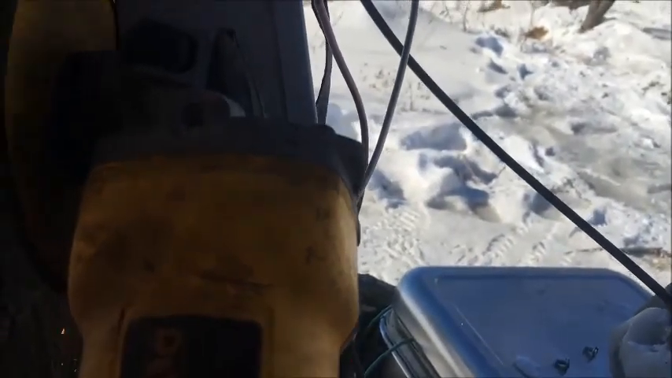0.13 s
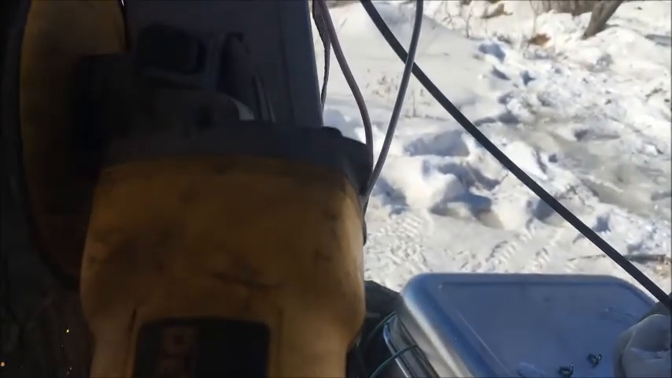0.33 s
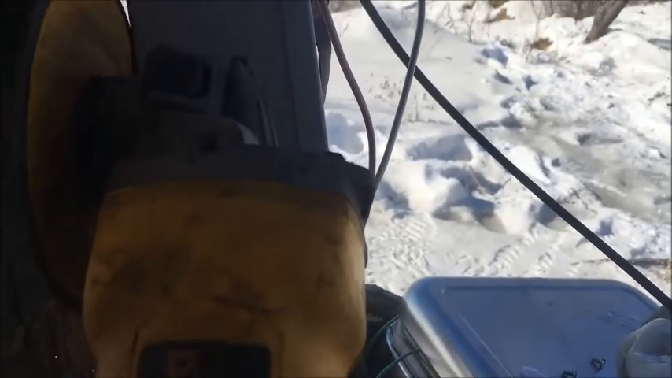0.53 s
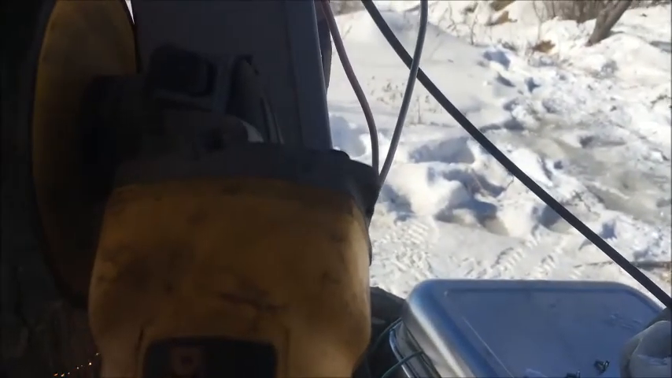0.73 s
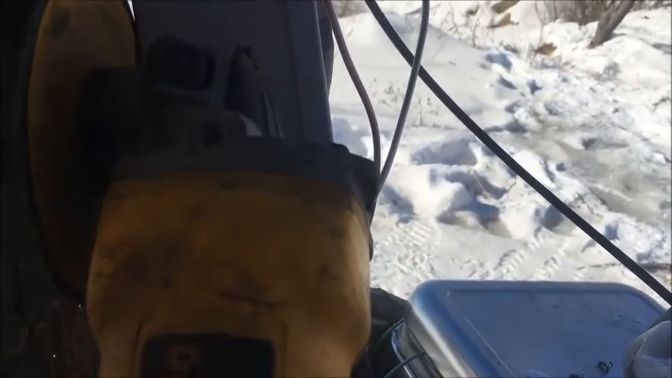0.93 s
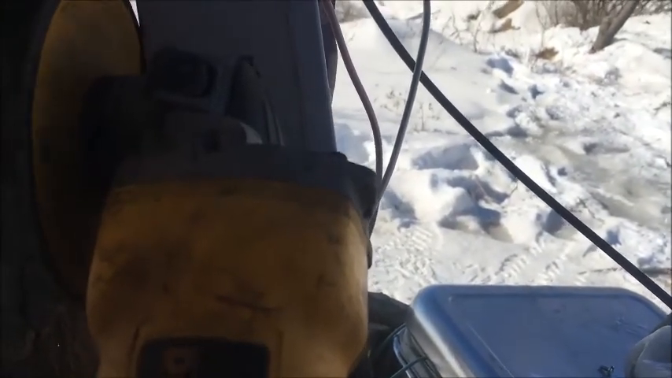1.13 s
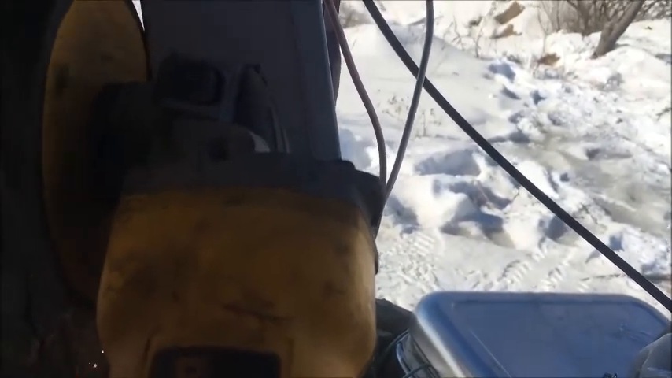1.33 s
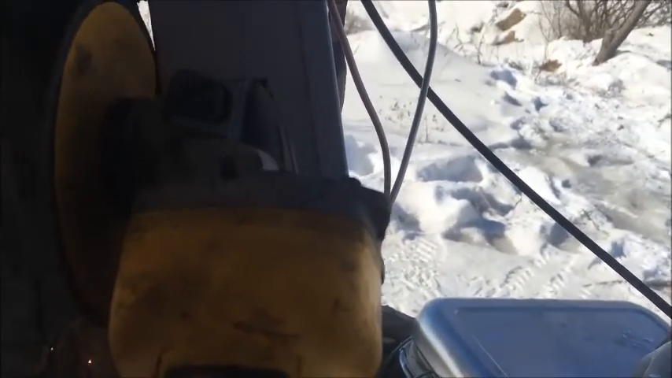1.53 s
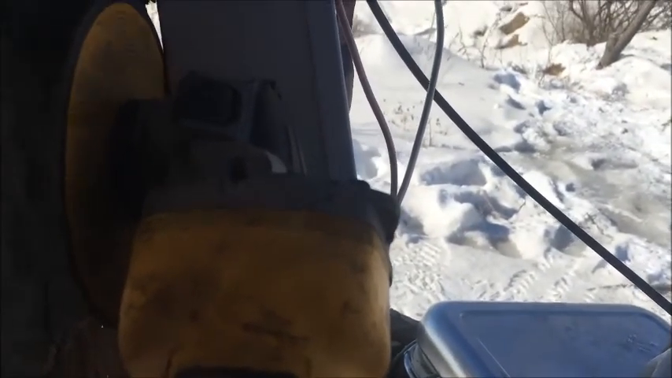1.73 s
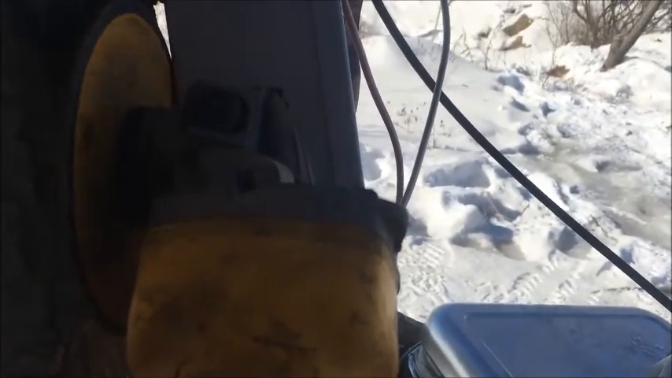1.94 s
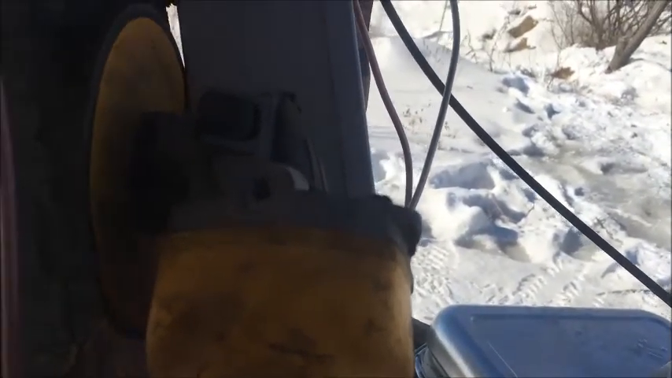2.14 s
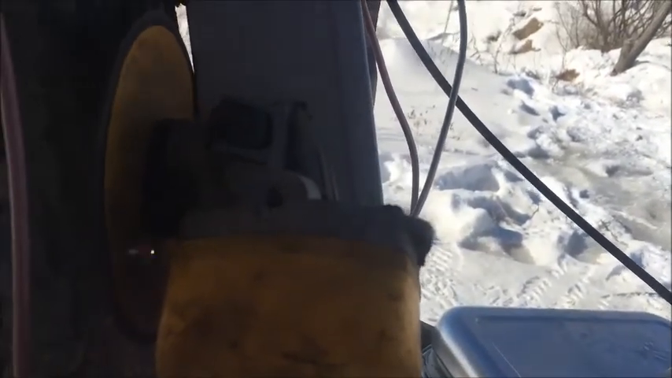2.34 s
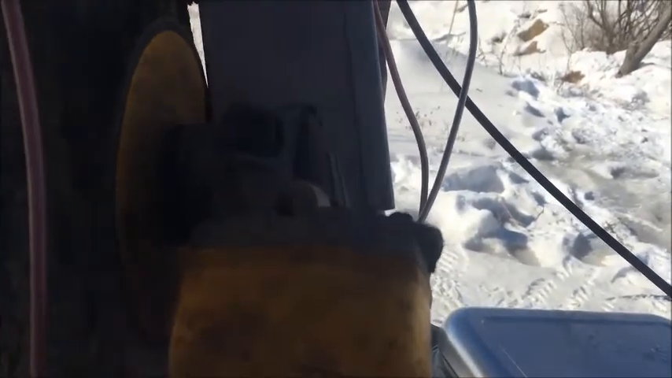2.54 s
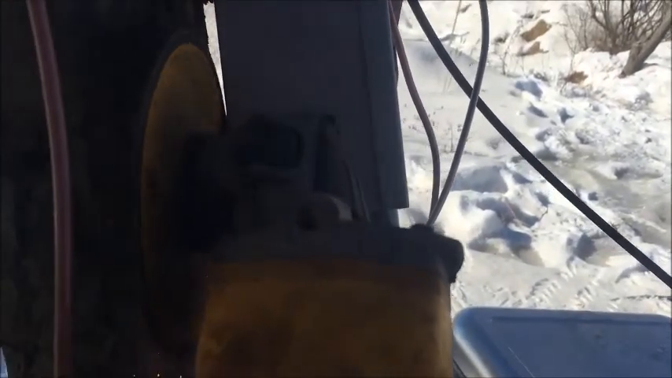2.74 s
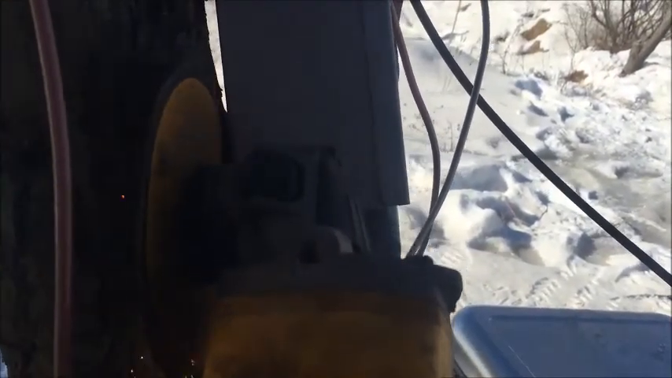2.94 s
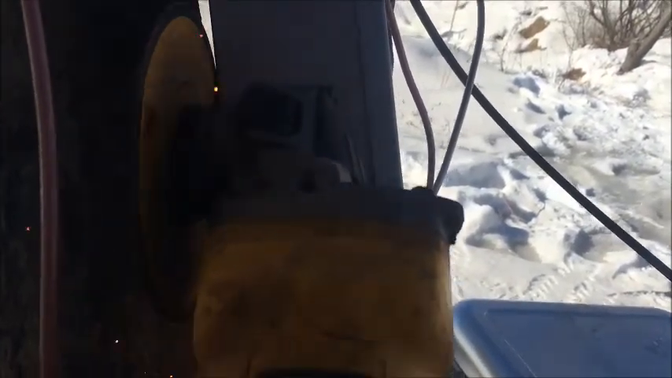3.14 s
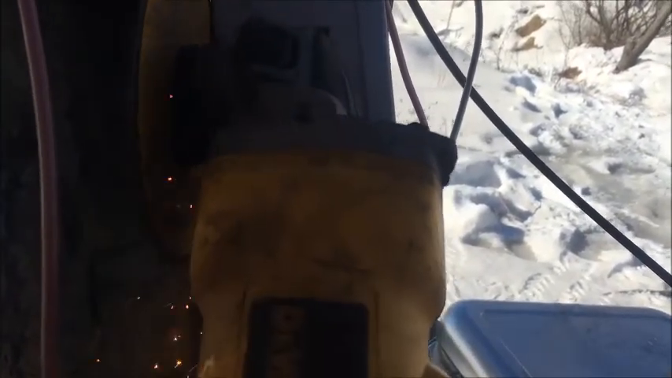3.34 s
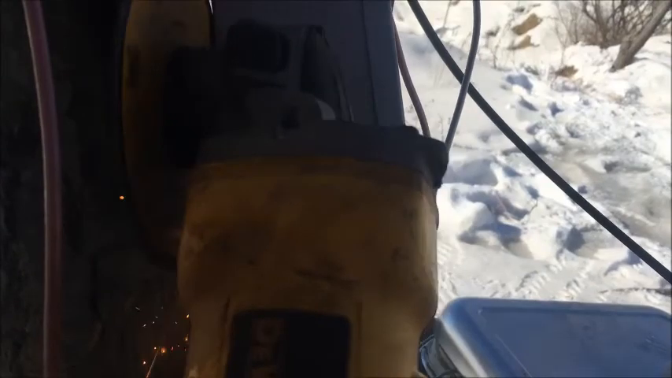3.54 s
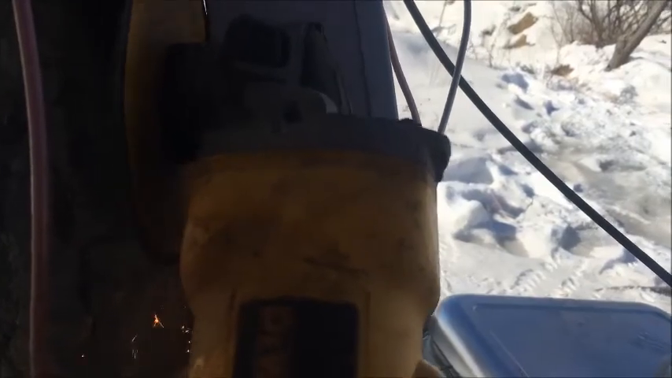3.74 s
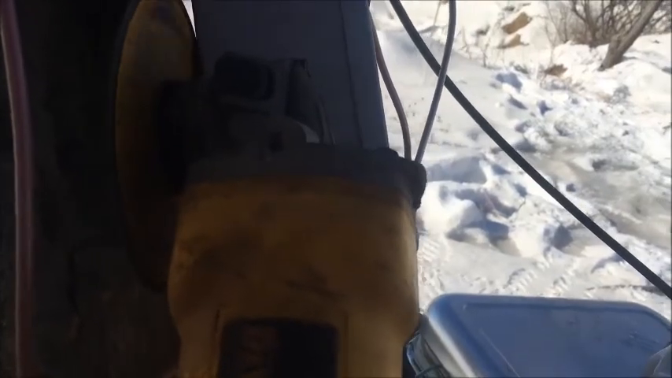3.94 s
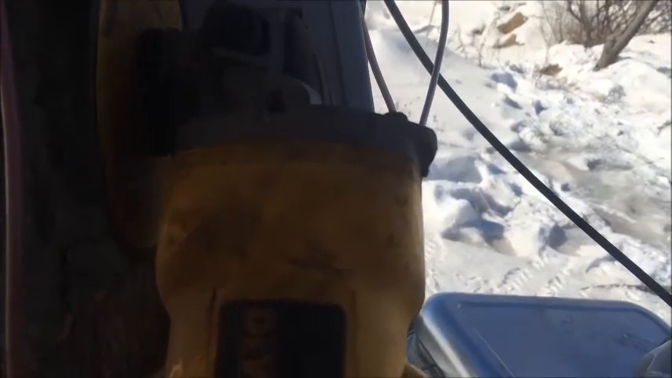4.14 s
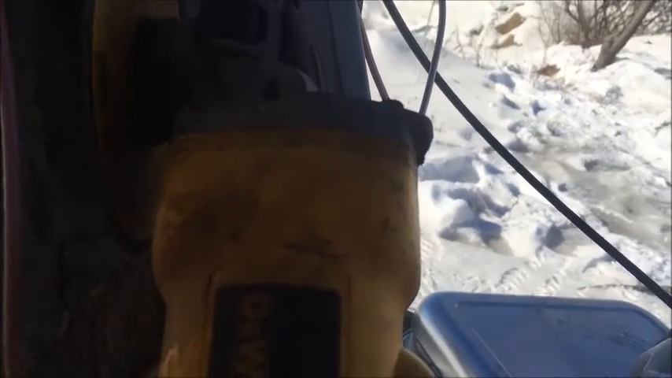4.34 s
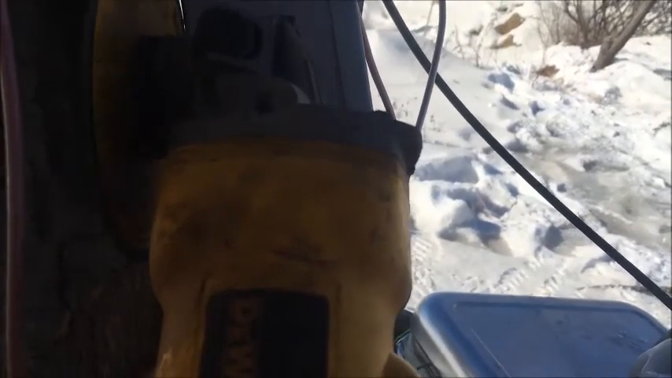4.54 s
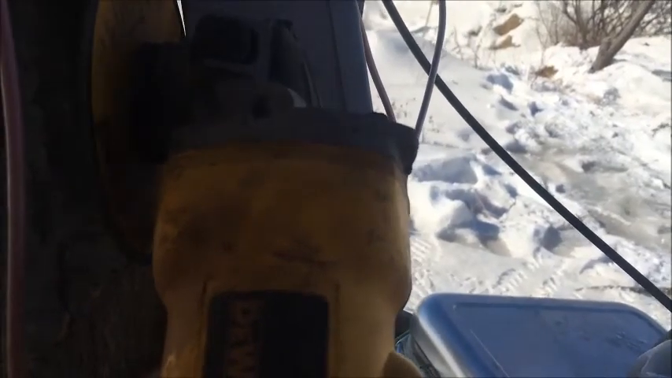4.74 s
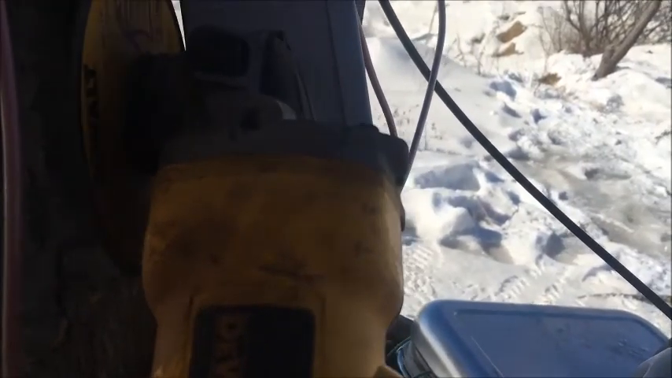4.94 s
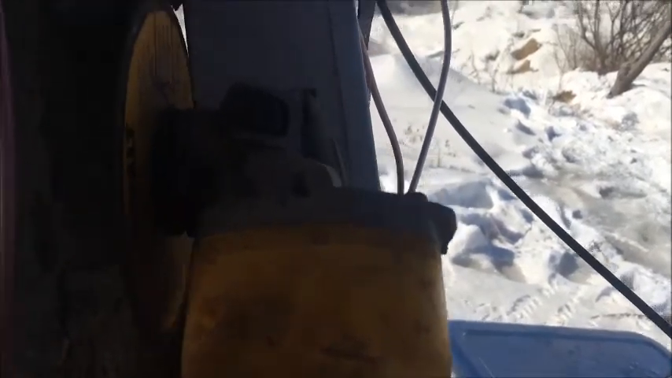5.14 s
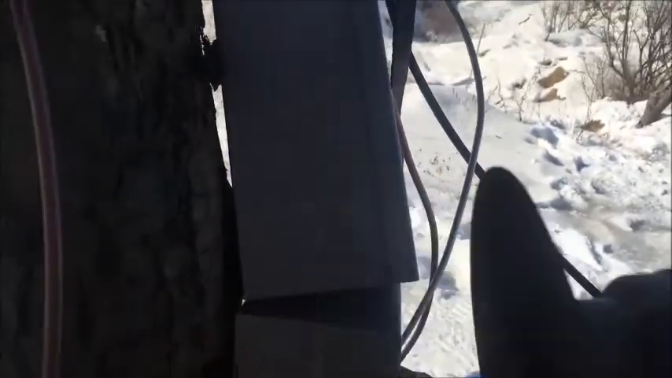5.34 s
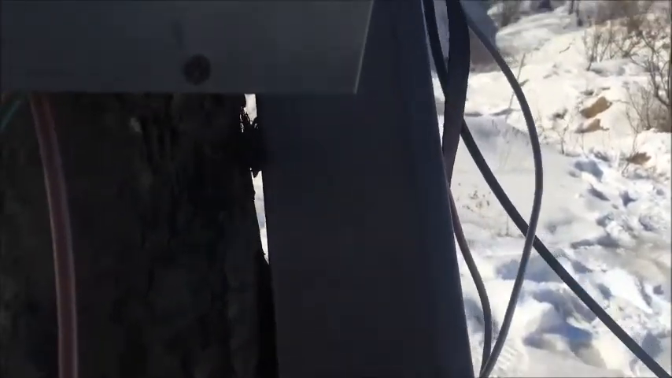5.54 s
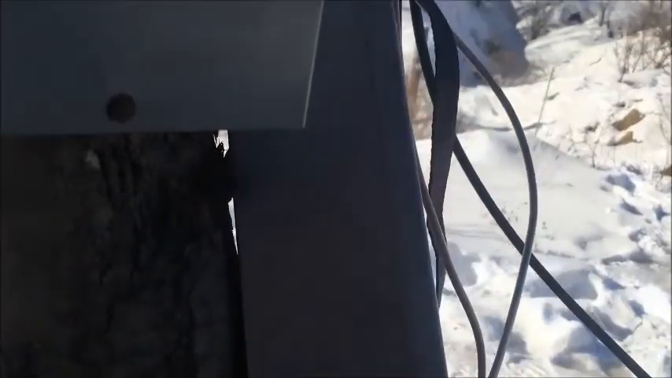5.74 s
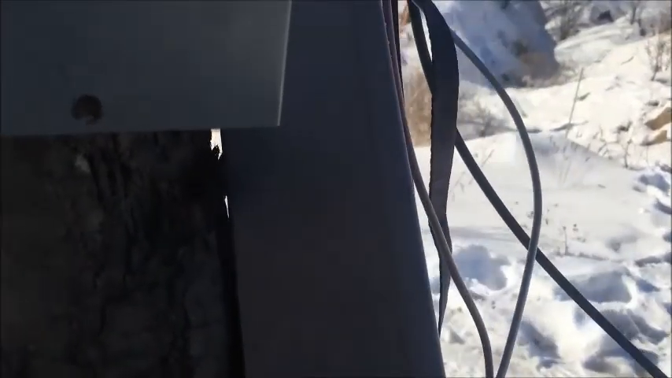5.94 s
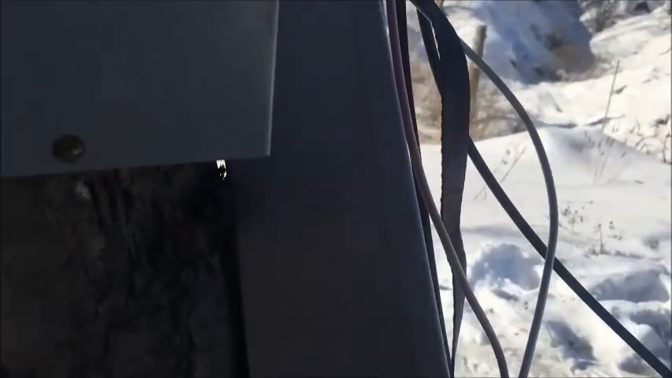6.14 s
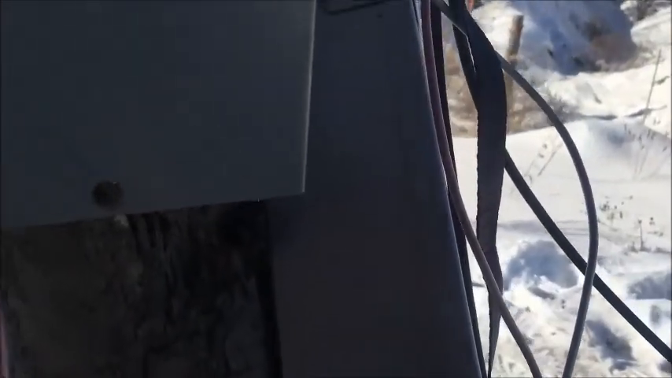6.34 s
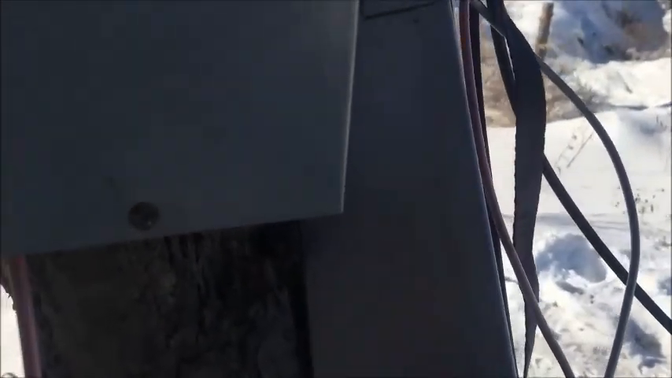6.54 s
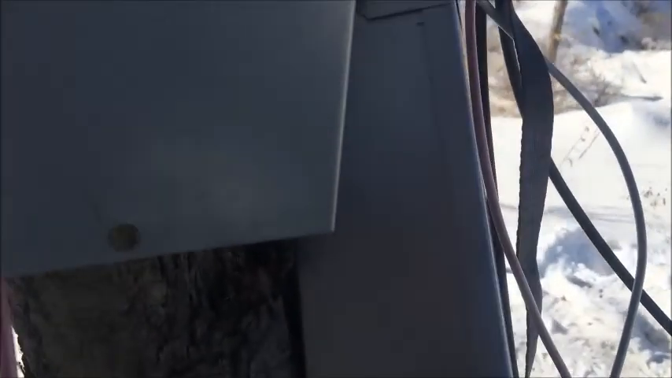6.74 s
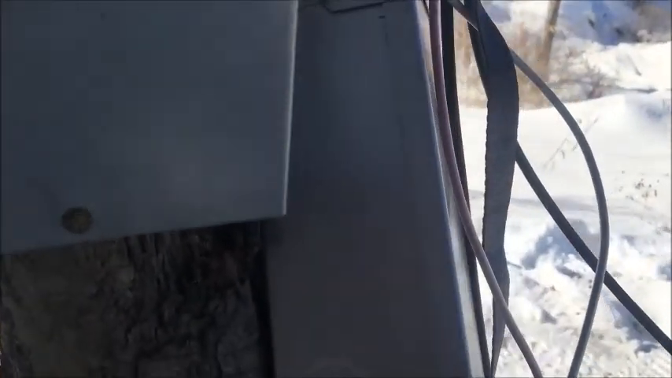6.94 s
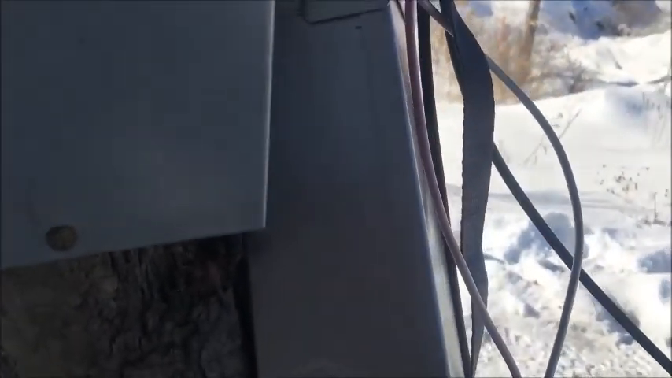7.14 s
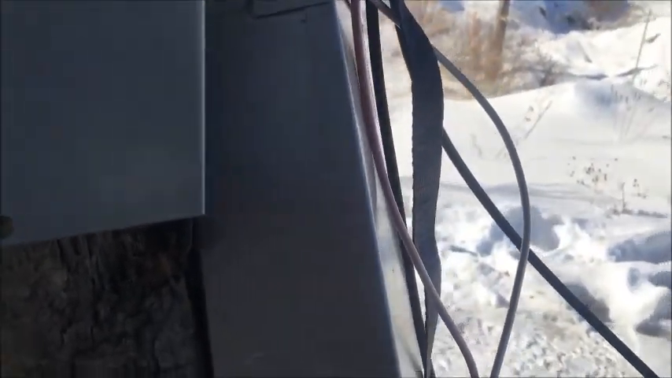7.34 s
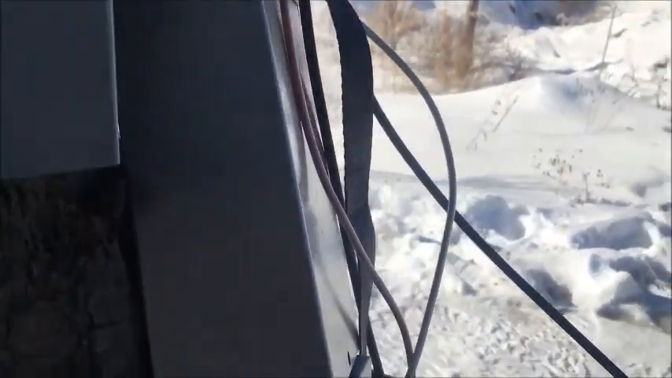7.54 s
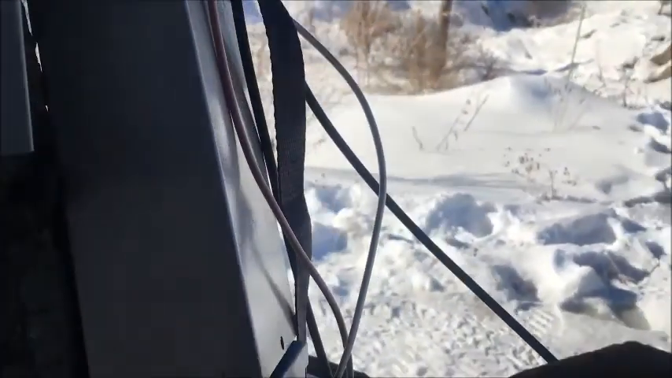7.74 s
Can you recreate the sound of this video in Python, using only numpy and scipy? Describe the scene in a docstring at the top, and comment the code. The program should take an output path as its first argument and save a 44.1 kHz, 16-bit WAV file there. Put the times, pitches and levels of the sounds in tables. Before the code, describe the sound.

Close harsh grinding with bright sizzle slows and chatters out; a brief steel clink, then low booming thuds and knocks over wind rumble.

```python
"""Outdoors at a wooden post, a mono microphone close to an angle grinder cutting screws.
Grit read round the turning disc and fresh noise ring disc and guard; gear and motor tones follow its turns.
The disc bogs down, coasts, stutters and stops, with short low jolts through the hand along the way.
Shaped noise gives background wind on the microphone and cloth rustle, plainest once the disc has stopped.
Then struck steel modes clink, ticks and knocks are puffs of noise, and thuds boom in three low modes."""
import sys
import numpy as np
from scipy import signal
from scipy.fft import rfft, irfft
from scipy.io import wavfile
from scipy.ndimage import uniform_filter1d, map_coordinates

SR = 44100
rng = np.random.default_rng(int(sys.argv[2]) if len(sys.argv) > 2 else 0)


def int16_out(signal):
    """Quantize to a 16-bit WAV file."""
    q = np.round(np.clip(np.atleast_2d(signal).T, -1, 1) * 32767)
    wavfile.write(sys.argv[1], SR, q.astype(np.int16))


N = 343980

# The disc at work, bogging down, recovering and coasting. Each row: time in seconds, speed in turns per second.
DISC_SPEED = [(0, 80.3), (.08, 80.7), (.2, 79.6), (.3, 79.5), (.5, 75.7), (.69, 76), (1, 72.4),
              (1.18, 73.1), (1.33, 70.8), (1.6, 70), (1.75, 71.6), (2, 72.2), (2.4, 75.5), (2.54, 74.4),
              (2.98, 76.5), (3.1, 74.2), (3.33, 79), (3.5, 52), (3.58, 41), (3.76, 67), (3.84, 74),
              (4.1, 56), (4.2, 47), (4.43, 34), (4.7, 22), (4.95, 13)]
# The cut. Each row: time in seconds, body level in dB, sizzle in dB above body (both before small trims).
CUT_LEVELS = [(0, -15.5, 3.5), (.08, -20, 6.5), (.64, -17.5, 5), (.8, -18.5, 3.5), (1.15, -18, 2.5),
              (1.7, -18, 3.5), (2.5, -20, 4.5), (3.2, -21, 7.5), (3.3, -17, 4), (3.4, -16.5, 5),
              (3.6, -21, 5), (3.64, -24.5, 9.5), (3.72, -21, 3), (3.88, -16, 3.5), (3.92, -19.5, 0.5),
              (3.97, -18.5, 3), (4.05, -20, 0), (4.2, -23, 3), (4.27, -27, 2), (4.45, -27, 0),
              (4.6, -25.5, 0), (4.7, -26, 2), (4.88, -30, -0.5), (4.94, -64, -3), (5.0, -85, -1)]
# Catches of the coasting disc, about once a turn. Each row: start in seconds, strength in dB re the rubbing
# (before the level is shared out).
BITES = [(4.1564, 13), (4.1778, 21), (4.1994, 3), (4.2195, 23), (4.2424, 11.5), (4.2637, 24), (4.406, 12),
         (4.434, 22.5), (4.465, 19.5), (4.498, 13), (4.583, 10), (4.621, 11.5), (4.719, 15.5), (4.7676, 6)]
# The slowed disc shoved against the steel again. Each row: start in seconds, added gain in dB, hold in seconds.
SHOVES = [(3.61, -22, 0.12), (4.299, -16.5, 0.057), (4.497, -20.5, 0.078), (4.707, -22, .08)]
# Spectrum of the rubbing. Each row: frequency in Hz, relative density in dB per Hz.
GRIND_SPECTRUM = [(29, -48.5), (50, -17), (252, -25), (371, -13), (428, -18.5), (746, -9), (1430, -14.5),
                  (3180, -5.5), (4790, -12.5), (6550, -7), (7390, -10), (10100, -10), (12600, -3.5),
                  (14900, -2), (16000, -7.5)]
# Disc and guard resonances. Each row: frequency in Hz, width in Hz, relative level in dB before the lift.
DISC_RESONANCES = [(1071, 13, -10), (1683, 82, -5), (2075, 26, -7.5), (2400, 310, -2), (2810, 48, 3.5),
                   (3190, 260, 0.5), (6570, 330, -4), (8400, 280, -4.5), (9150, 710, -2), (11130, 260, 4.5),
                   (12260, 540, 3), (13900, 140, 3), (15700, 240, 2)]
# Shake of the unbalanced disc. Each row: multiple of disc speed, starting level in dB re hum noise.
UNBALANCE = [(1, 0.5), (2, 3.5), (3, 2.5), (4, 2), (5, 1)]
# Motor tone when the disc is dragged down. Each row: time in seconds, mean level in dB.
MOTOR_LEVELS = [(3.36, -70), (3.43, -30), (3.72, -28), (3.8, -60), (4.42, -60), (4.5, -43), (4.68, -44),
                (4.75, -90)]
# Narrow bands of the rubbing that sing out for a while, some gliding as the disc slows. Each row:
# start in seconds, end in seconds, first pitch in Hz, last pitch in Hz, level in dB before the fades.
SINGING = [(0, .5, 2530, 2460, -27.5), (.05, .9, 2170, 2100, -30), (0.5, 2.4, 7600, 6300, -28),
           (0.851, 2.1, 1580, 1700, -33), (1.5, 3.2, 15800, 14000, -26), (1.85, 2.55, 3300, 3000, -28),
           (2.25, 3.05, 2430, 2420, -30.5), (2.3, 3.3, 12600, 12450, -16), (2.6, 3.2, 1970, 1934, -28.5),
           (3.38, 3.55, 2470, 2170, -22), (3.2, 3.33, 1905, 1910, -25), (3.75, 4.12, 730, 560, -43.5),
           (3.45, 4.14, 1226, 1350, -35.5), (3.85, 4.3, 203, 220, -46), (3.95, 4.15, 1600, 1650, -30),
           (4.85, 5.12, 160, 150, -60), (4.7, 4.86, 1850, 1630, -30)]
# Background air throughout, held at the first row until 4.8 s. Each row: time in seconds,
# mean wind level in dB, level of rustle and hiss in dB.
AIR_LEVELS = [(4.8, -59, -41), (4.9, -55, -61.5), (5.14, -47.5, -61), (5.35, -41, -42.5), (5.5, -36, -39),
              (5.65, -40.5, -45), (5.8, -40.5, -52.5), (6.5, -41.5, -51), (7.03, -29, -50),
              (7.2, -40.5, -56), (7.38, -36, -56.5), (7.5, -36, -52.5), (7.8, -37, -47.5)]
# Spectrum of wind on the microphone. Each row: frequency in Hz, relative density in dB per Hz.
WIND_SPECTRUM = [(12, -25), (20, -0.5), (50, -6.5), (182, -24.5), (220, -36.5), (304, -38), (348, -41),
                 (500, -44.5), (650, -63.5), (1100, -120)]
# Spectrum of the cloth rustle. Each row: frequency in Hz, relative density in dB per Hz.
RUSTLE_SPECTRUM = [(120, -33), (200, 4), (380, -10.5), (409, -10), (448, -9), (933, -6), (2330, -9.5),
                   (7680, -19.5), (14900, -21.5), (16000, -1)]
# Jolts through the hand. Each row: start in seconds, envelope level in dB.
JOLTS = [(0.223, -44), (0.289, -33.5), (0.603, -33), (0.808, -28), (2.387, -37), (3.338, -31.5),
         (3.622, -32)]
# Touches of steel as the tool is drawn back. Each row: start in seconds, envelope level in dB.
CLINK_TOUCHES = [(5.169, -34), (5.1908, -12.5), (5.198, -17), (5.206, -16), (5.216, -3.5), (5.2325, -32),
                 (5.2512, -17), (5.262, -15), (5.272, -28)]
# Modes of the touched steel. Each row: frequency in Hz, drive in dB, decay time t60 in seconds.
STEEL_MODES = [(1083, -45.5, 0.095), (1718, -48, 0.093), (2290, -50, 0.094), (2740, -40, 0.045),
               (3314, -35.5, 0.023), (3480, -38, 0.022), (4320, -51, 0.017), (5700, -62, 0.076)]
# Small ticks. Each row: start in seconds, level in dB before band-passing, centre in Hz.
TICKS = [(6.044, -36.5, 6500), (6.127, -41.5, 9100), (6.462, -30, 330), (6.827, -26, 3150),
         (7.157, -43, 9000), (7.187, -42, 3540), (7.392, -25, 3250), (7.46, -41, 6000), (7.755, -43, 600)]
# Knocks. Each row: start in seconds, level in dB, centre in Hz.
KNOCKS = [(6.53, -29.5, 1760), (6.585, -24, 431), (6.606, -16, 1750), (6.679, -22, 1720), (6.698, -41, 415),
          (6.727, -24.5, 2260), (6.762, -32, 1620), (6.786, -39.5, 880), (6.977, -30.5, 1590),
          (7.002, -43, 2600), (7.041, -25, 1380), (7.06, -39, 401), (7.084, -34.5, 433), (7.325, -31, 1360),
          (7.343, -53, 401), (7.525, -33, 1330), (7.543, -47, 1550), (7.666, -44.5, 1530),
          (7.79, -34.5, 1550)]
# Spectrum shared by the knocks. Each row: frequency in Hz, relative density in dB per Hz.
KNOCK_SPECTRUM = [(150, -17), (250, -14), (360, -14.5), (1180, -16.5), (1550, -11), (2050, -18.5),
                  (2670, -16), (4650, -26), (5930, -22.5), (16000, -28)]
# Thuds on a hollow body. Each row: start in seconds, lowest-mode level in dB, its t60 in seconds,
# upper-mode level in dB re the lowest.
THUDS = [(6.533, -12.5, 0.15, -14), (6.552, -7.5, 0.34, -20), (6.583, -4.5, 0.18, -14),
         (6.607, -4.5, 0.3, -10), (6.684, -10, 0.19, -10.5), (6.732, -16, 0.27, -7.5),
         (6.77, -15.5, 0.27, -9), (6.857, -24, 0.42, -19), (6.982, -20.5, 0.22, -10.5),
         (7.048, -0.5, 0.087, -24.5), (7.097, -10, 0.2, -37), (7.329, -21, 0.31, -11),
         (7.394, -25.5, 0.24, -30), (7.491, -34, 0.2, -7), (7.534, -20.5, 0.24, -18),
         (7.578, -24.5, 0.55, -26), (7.674, -29, 0.23, -21)]

GROWL_HZ, BODY_HZ, SIZZLE_HZ = 265, 950, 4700   # lower edges of the cut's bands
GROWL_DB, HUM_DB, LOWS_FADE_DB = -18, -28, -10   # mean levels re body; the lows fade as the disc coasts
FREE_SPEED = 80   # turns per second
GEAR_ORDER, MOTOR_ORDER = 64.3, 32   # multiples of disc speed
WHINE_DB, WHINE_DB_PER_LOST_TURN = -41, 1.3972   # the gear whines louder under load
BITE_T60_S = 0.021
SHOVE_ATTACK_S, SHOVE_T60_S = .015, 0.28
SINGING_WIDTH = .035   # width of each pole, as a share of first pitch
TREBLE_HISS_DB = -12.5   # re rustle, before band-passing
JOLT_HZ, JOLT_T60_S = 88, 0.089
TICK_T60_S, TICK_SPREAD = 0.034, 2.23   # spread: ratio of band edge to centre
KNOCK_T60_S = 0.081
BOOM_HZ = 86.8
MIDDLE_HZ, MIDDLE_DB, MIDDLE_T60_S = 103, -9.5, 0.13   # level re lowest mode
UPPER_HZ, UPPER_T60_S = 194.6, 0.31
MIC_LOW_HZ, CUTOFF_HZ = 45, 15760


def from_db(db):
    """Decibels to gain."""
    return 10 ** (np.asarray(db) / 20)


def rms_one(x):
    """Scale to unit power."""
    return x / np.sqrt(np.mean(x ** 2) + 1e-20)


def in_time(rows, left=None, right=None):
    """Columns of a curve table, one value per sample."""
    s, *columns = np.transpose(rows)
    return [np.interp(np.arange(N) / SR, s, c, left, right) for c in columns]


def drift(rate):
    """Slow random wandering with spread 1, smoothed by two equal poles and drawn every 40 samples."""
    r = np.exp(-80 * np.pi * rate / SR)
    noise = rng.standard_normal(N // 40 + 2002)
    slow = signal.lfilter([1], [1, -2 * r, r * r], noise)[2000:]
    return np.interp(np.arange(N) / 40, np.arange(len(slow)), rms_one(slow))


def colour(x, spectrum, peaks=(), lift_db=0.):
    """Give noise a spectrum, with resonances standing on it."""
    hz = np.maximum(np.fft.rfftfreq(N, 1 / SR), 1)
    points = np.array(spectrum)
    power = from_db(2 * np.interp(np.log(hz), np.log(points[:, 0]), points[:, 1]))
    for centre_hz, width_hz, db in peaks:
        power = power + from_db(2 * (db + lift_db)) / (1 + (2 * (hz - centre_hz) / width_hz) ** 2)
    return rms_one(irfft(rfft(x) * np.sqrt(power), N))


def band(x, low_hz, high_hz, order=3):
    """Butterworth band-pass."""
    return signal.sosfilt(signal.butter(order, [low_hz, high_hz], "band", fs=SR, output="sos"), x)


def decay(s, t60, rise):
    """Start sample and envelope of one blow: a linear rise over an exponential decay."""
    at = int(s * SR)
    t = np.arange(min(N - at, int(3.7 * t60 * SR) + 1)) / SR
    return at, np.minimum(t / rise, 1) * from_db(-60 * t / t60)


def sine(hz, count):
    """A steady tone of so many samples, starting at zero."""
    return np.sin(2 * np.pi * hz * np.arange(count) / SR)


def patchy(x, low_hz, high_hz, depth_db, count):
    """Narrow neighbouring bands that swell and sink, each on its own."""
    edges = np.geomspace(low_hz, high_hz, count + 1)
    total = 0
    for k in range(count):
        level_db = depth_db * (drift(1.52) + 0.83 * drift(11.0))
        strip = band(x, edges[k], edges[k + 1], order=2)
        total = total + (-1) ** k * strip * from_db(level_db)   # neighbours alternate in sign
    return rms_one(total)


def rim(turns, orders, memory, size=2048):
    """A pattern round the disc, read as it spins; it wears a little from turn to turn."""
    count = int(turns[-1]) + 2
    spectra = rng.standard_normal((count, orders)) + 1j * rng.standard_normal((count, orders))
    spectra = signal.lfilter([1], [1, -memory], spectra, axis=0)[:, 1:]
    spectra = spectra / np.hypot(1, np.arange(1, orders) / 110.0)     # finer detail is weaker
    pattern = irfft(np.pad(spectra, ((0, 0), (1, 0))), size, axis=1)
    along = turns % 1
    rows = np.concatenate([pattern, pattern[:, :1]], axis=1)   # close the circle
    return rms_one(map_coordinates(rows, [turns, along * size], order=1))


def bites():
    """Gain of the coasting disc's catches: short bursts over the rubbing."""
    catch = np.ones(N)
    for s, db in BITES:
        at, shape = decay(s, BITE_T60_S, rise=0.0079)
        catch[at:at + len(shape)] += from_db(db) * shape
    return catch / uniform_filter1d(catch, size=3000)      # bites share out the level


def pressure():
    """Gain of the cut: its slow level plus the late shoves, each an attack, a hold and a release."""
    level_db, _ = in_time(CUT_LEVELS)
    t, gain = np.arange(N) / SR, 0
    for s, db, hold in SHOVES:
        release_db = -60 * np.maximum(t - s - hold, 0) / SHOVE_T60_S
        attack = np.clip((t - s) / SHOVE_ATTACK_S, 0, 1)
        gain = gain + from_db(db + release_db) * attack
    lifted, = in_time([(4.88, 0.85), (4.94, 0)])
    return from_db(level_db) + gain * lifted


def singing(excitation):
    """Each row picks a narrow, moving band out of the rubbing, swelling and fading."""
    out = np.zeros(N)
    for start, end, first_hz, last_hz, db in SINGING:
        a, b = int(start * SR), int(end * SR)
        turn = np.exp(2j * np.pi * np.cumsum(np.linspace(first_hz, last_hz, b - a)) / SR)
        keep = np.exp(-np.pi * SINGING_WIDTH * first_hz / SR)     # two poles: steep flanks
        slow = signal.lfilter([1], [1, -2 * keep, keep ** 2], excitation[a:b] / turn)
        tone = rms_one((slow * turn).real)
        out[a:b] += from_db(db) * signal.windows.tukey(b - a, .8) * tone
    return out


def gear_whine(turns, speed):
    """A sine at the gear's multiple of disc speed, louder for each turn lost, gone once the disc bogs down."""
    fade_db, = in_time([(3.3, 0), (3.45, -130.5)])
    level_db = WHINE_DB + WHINE_DB_PER_LOST_TURN * (FREE_SPEED - speed) + fade_db
    phase = 2 * np.pi * GEAR_ORDER * turns + .5 * drift(28)
    return from_db(level_db + 1.7 * drift(8.1)) * np.sin(phase)


def motor_tone(turns):
    """A sine at the motor's multiple of disc speed, its level and phase wandering."""
    level_db, = in_time(MOTOR_LEVELS, left=-120)
    phase = 2 * np.pi * MOTOR_ORDER * turns + .8 * drift(30)
    return from_db(level_db + 3.4 * drift(11)) * np.sin(phase)


def grinder():
    """Repeating grit plus fresh sparks, throbbing with the disc's wobble, ringing disc and guard."""
    speed, = in_time(DISC_SPEED)
    turns = np.cumsum(speed) / SR
    running, = in_time([(3.2, 0.84), (3.4, 0.6)])     # weight of what repeats each turn
    coasting, = in_time([(3.8, 0.078), (4.2, 0.92)])

    grit = rim(turns, orders=200, memory=0.919) * running
    # slow grit is coarser: the noise gets spikier and lumpier
    spark_db = (1.5 + 2.7 * coasting) * rng.standard_normal(N) + 2.5 * coasting * drift(120)
    sparks = rng.standard_normal(N) * from_db(spark_db)
    once_a_turn = (0.52 + 0.69 * drift(0.54)) * np.cos(2 * np.pi * turns)
    wobble = from_db(once_a_turn + 1.5 * rim(turns, orders=6, memory=.99) + .5 * drift(17))
    rubbing = (from_db(-0.5) * grit + rms_one(sparks)) * wobble
    rub = colour(rubbing, GRIND_SPECTRUM, DISC_RESONANCES, lift_db=-1.0)
    catch = bites()

    fade_db, = in_time([(3.3, 0), (4.4, LOWS_FADE_DB)])
    unbalance = 0
    for k, db in UNBALANCE:
        unbalance = unbalance + from_db(db + 2.0 * drift(2.2)) * np.sin(2 * np.pi * k * turns)
    hum = rms_one(rms_one(band(rub, 38, GROWL_HZ)) + unbalance * running ** 3)
    hum = hum * from_db(HUM_DB + fade_db + 3.0 * drift(5.5))
    mesh = from_db(-3.0 + 1.9 * drift(4.7)) * np.sin(2 * np.pi * 10 * turns) * running
    growl = rms_one(rms_one(-band(rub, GROWL_HZ, BODY_HZ, order=2)) + mesh)
    growl = growl * from_db(GROWL_DB + fade_db + 1.0 * drift(5.2))
    _, sizzle_db = in_time(CUT_LEVELS)
    body = patchy(rub, BODY_HZ, SIZZLE_HZ, depth_db=1.0, count=14) * from_db(-1.44) * catch
    sizzle = patchy(rub, SIZZLE_HZ, 17500, depth_db=1.7, count=24) * from_db(sizzle_db + 0.2) * catch

    cut = pressure() * (hum + growl + body + sizzle)
    tones = gear_whine(turns, speed) + motor_tone(turns)
    still_turning, = in_time([(5.0, 1), (5.1, 0)])
    return (cut + tones) * still_turning + singing(rubbing) * catch


def surroundings():
    """Lumpy wind on the microphone, with grainy rustle and a thin treble hiss above it."""
    wind_db, air_db = in_time(AIR_LEVELS)
    wind = colour(rng.standard_normal(N), WIND_SPECTRUM) * from_db(wind_db + 2.0 * drift(4.6))
    grains = colour(rng.standard_normal(N) * from_db(1.0 * drift(40)), RUSTLE_SPECTRUM)
    rustle = patchy(grains, 147.6, 17900, depth_db=.8, count=14)
    hiss = from_db(TREBLE_HISS_DB) * band(rng.standard_normal(N), 5000, 17000)
    return wind + (rustle + hiss) * from_db(air_db)


def jolts():
    """Short low bumps: decaying sines at one pitch."""
    out = np.zeros(N)
    for s, db in JOLTS:
        at, shape = decay(s, JOLT_T60_S, rise=0.0066)
        out[at:at + len(shape)] += from_db(db) * shape * sine(JOLT_HZ, len(shape))
    return out


def clink():
    """Short scratchy touches ring the steel's modes, each a two-pole resonator."""
    touch, out, noise = np.zeros(N), 0, rng.standard_normal(N)
    for s, db in CLINK_TOUCHES:
        at, shape = decay(s, t60=0.057, rise=0.0011)
        touch[at:at + len(shape)] += from_db(db) * shape
    scratch = touch * noise + 1e-18
    for hz, db, t60 in STEEL_MODES:
        r, w = from_db(-60 / (t60 * SR)), 2 * np.pi * hz / SR
        ring = signal.lfilter([0, np.sin(w)], [1, -2 * r * np.cos(w), r * r], scratch)
        out = out + from_db(db) * ring
    return out + from_db(-15.0) * touch * band(noise, 840, 16000)


def ticks():
    """Short dry clicks of noise, each in a band of its own."""
    out, noise = np.zeros(N), rng.standard_normal(N)
    for s, db, hz in TICKS:
        at, shape = decay(s, TICK_T60_S, rise=0.0015)
        puff = noise[at:at + len(shape)] * shape
        click = band(puff, hz / TICK_SPREAD, min(hz * TICK_SPREAD, 19000), order=2)
        out[at:at + len(shape)] += from_db(db) * click
    return out


def knocks():
    """Each knock is a crack and a dying puff of noise, tilted toward its own centre."""
    out, noise = np.zeros(N), colour(rng.standard_normal(N), KNOCK_SPECTRUM)
    for s, db, hz in KNOCKS:
        at, shape = decay(s, KNOCK_T60_S, rise=0.002)
        crack = 0.52 * from_db(-15.0 * np.arange(len(shape)) / 100)   # falls 15 dB per 100 samples
        puff = noise[at:at + len(shape)] * shape * (1 + crack)
        centred = band(puff, hz / 2, min(hz * 2, 16000), order=1)
        out[at:at + len(shape)] += from_db(db) * (puff + centred)
    return out


def boom():
    """Each thud swells for about a cycle, then rings out in three low modes of a hollow body."""
    out = np.zeros(N)
    for s, db, t60, upper_db in THUDS:
        modes = [(BOOM_HZ, db, t60),
                 (MIDDLE_HZ, db + MIDDLE_DB, MIDDLE_T60_S),
                 (UPPER_HZ, db + upper_db, UPPER_T60_S)]
        for mode_hz, level_db, ring_s in modes:
            at, shape = decay(s, ring_s, rise=0.0095)
            out[at:at + len(shape)] += from_db(level_db) * shape * sine(mode_hz, len(shape))
    return out


def scene():
    """One microphone feeds both channels."""
    mono = grinder() + surroundings() + jolts() + clink() + ticks() + knocks() + boom()
    return np.array([mono, mono])


def record(dry):
    """The microphone drops the deepest bass, the highest peaks overload and the top is cut."""
    low_cut = signal.butter(4, MIC_LOW_HZ, "high", fs=SR, output="sos")
    top_cut = signal.ellip(12, .3, 85, CUTOFF_HZ, fs=SR, output="sos")
    overloaded = np.clip(signal.sosfilt(low_cut, dry), -.85, .85)
    return np.clip(signal.sosfilt(top_cut, overloaded), -1, 1)


dry = scene()
out = record(dry)
int16_out(out)
```